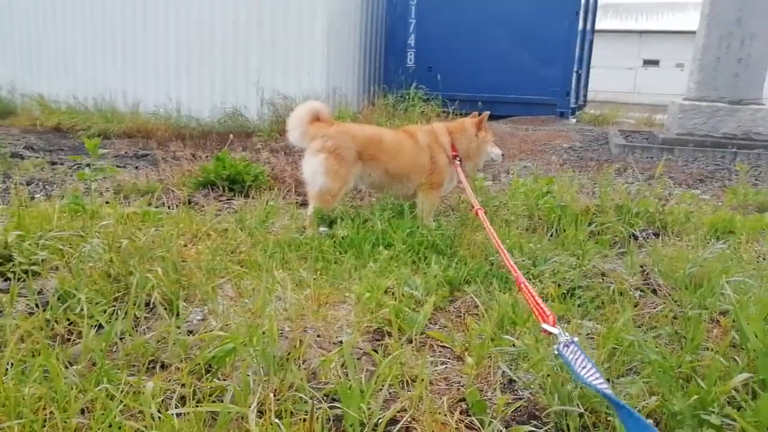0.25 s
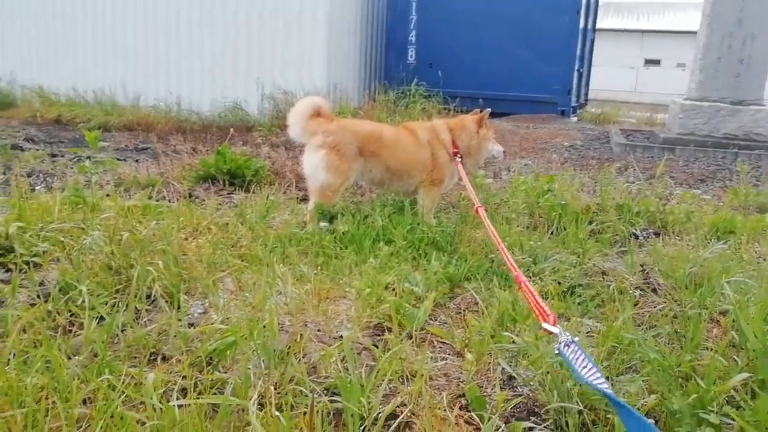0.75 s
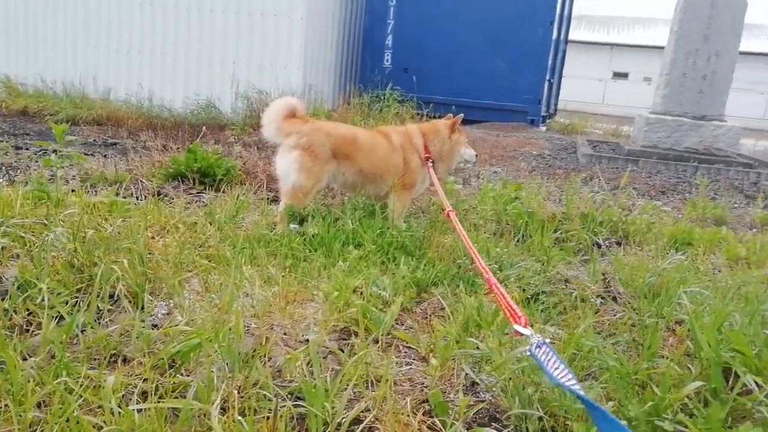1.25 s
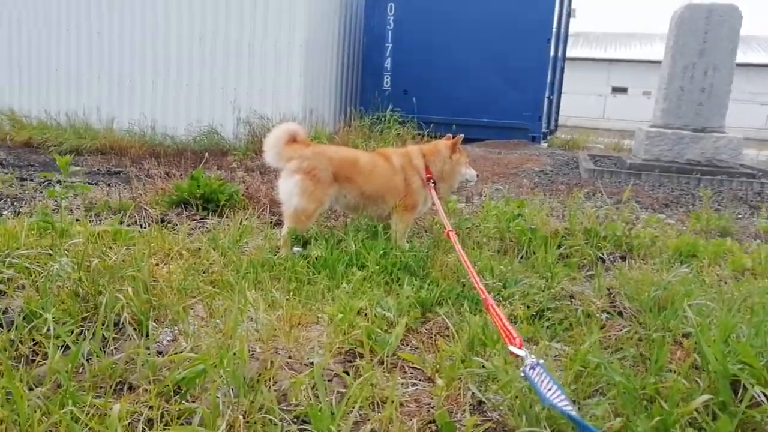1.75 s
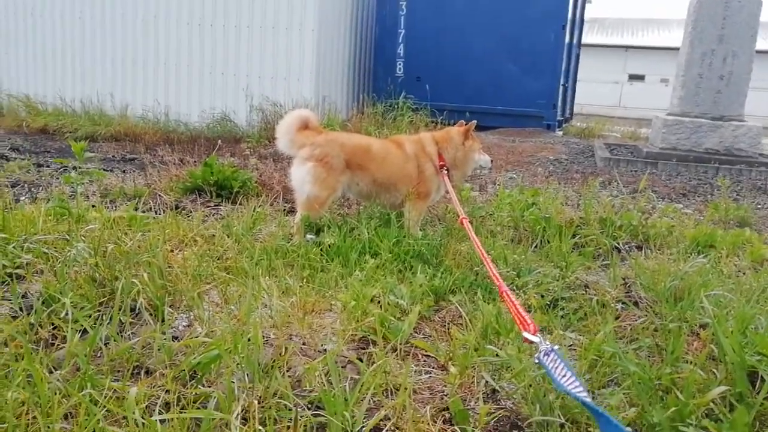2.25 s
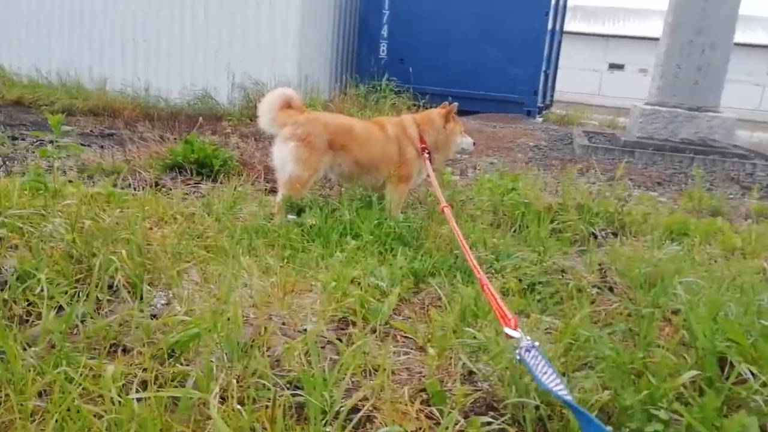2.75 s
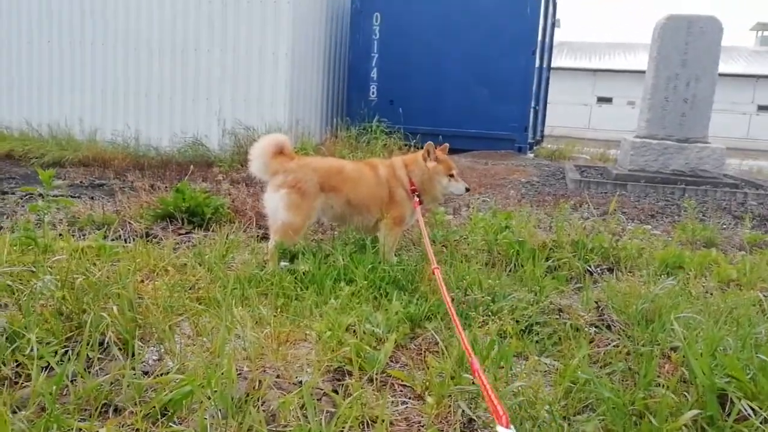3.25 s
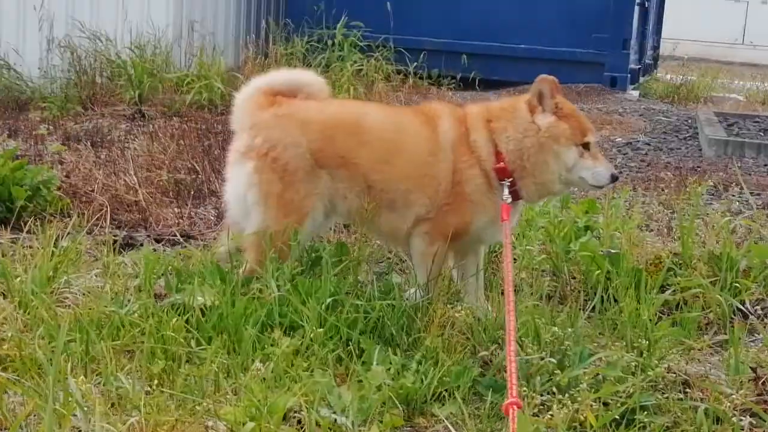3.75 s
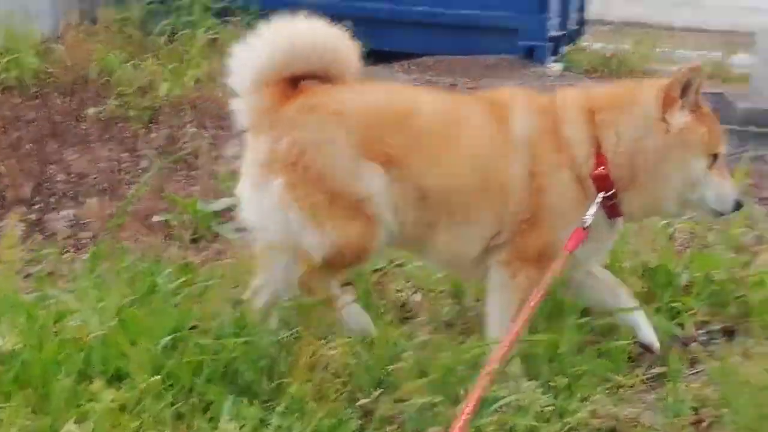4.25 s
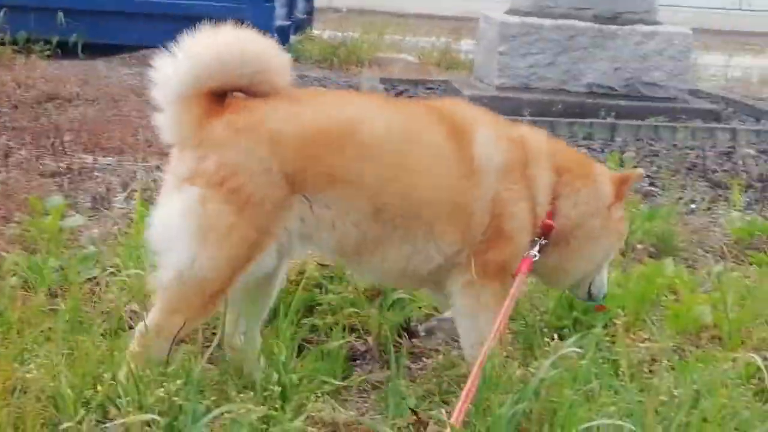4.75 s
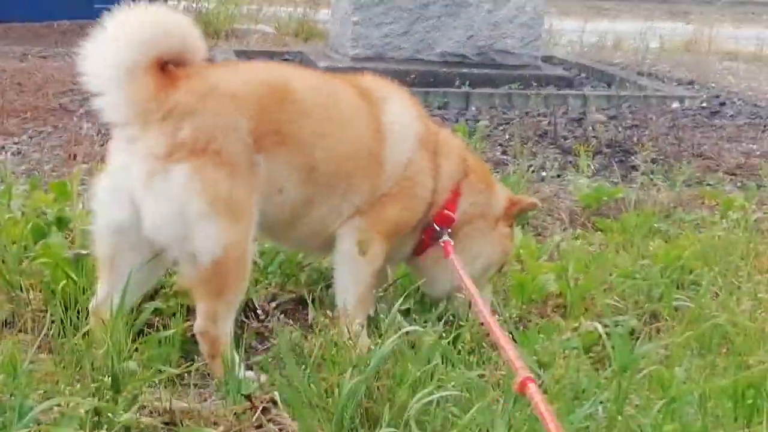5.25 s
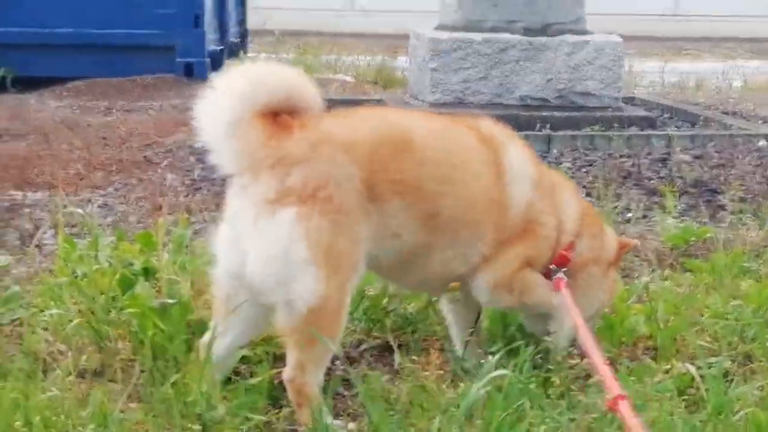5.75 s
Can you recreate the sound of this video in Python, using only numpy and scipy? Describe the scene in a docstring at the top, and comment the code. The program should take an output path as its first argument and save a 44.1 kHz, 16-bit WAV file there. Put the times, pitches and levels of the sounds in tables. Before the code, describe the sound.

A hand rubs, clicks and knocks on a camera outdoors, then a dog swishes through grass over a faint wavering engine hum.

```python
"""Outdoors in grass and weeds: a leashed dog steps and noses about, a few metres from a hand-held camera.
The dog's sweeps shape dense noisy grains of blade sound; paws set off bursts, and stems snap as damped pings.
Close to the right microphone port the hand rubs (noise and ringing bands), ticks (clicks) and knocks (case modes).
Far off an engine hums as wavering sines over rumble, in open-air noise; a thin insect-like buzz comes and goes."""
import sys
import numpy as np
from scipy import signal
from scipy.fft import rfft, irfft, next_fast_len
from scipy.io import wavfile
from scipy.ndimage import uniform_filter1d, map_coordinates

SR = 44100
rng = np.random.default_rng(int(sys.argv[2]) if len(sys.argv) > 2 else 0)


def put_to_file(sound):
    """Save the sound as 16-bit audio at rate SR, in the file named by the first command-line argument."""
    columns = np.atleast_2d(sound).T  # one column per channel
    safe = np.clip(columns, -1, 1)
    whole_steps = np.round(safe * 32767)
    wavfile.write(sys.argv[1], SR, whole_steps.astype(np.int16))


N = 264159
TIME = np.arange(N) / SR  # s


def amp(db):
    """Decibels to gain."""
    return 10 ** (np.asarray(db) / 20)


def unit(x):
    """Scale to rms 1."""
    return x / np.sqrt(np.mean(x ** 2) + 1e-20)


def along(points, hz):
    """Interpolate (frequency, value) points on a log frequency axis."""
    point_hz, value = np.transpose(points)
    return np.interp(np.log(hz + 1), np.log(point_hz + 1), value)


def curves(rows):
    """One value per sample for each column after the time."""
    start_s, *columns = np.transpose(rows)
    return [np.interp(TIME, start_s, column) for column in columns]


def wobble(rate):
    """A smooth random curve through rate normal draws a second."""
    knots = rng.standard_normal(int(N * rate / SR) + 4)
    return map_coordinates(knots, [TIME * rate])


def filtered(x, response):
    """Multiply the spectrum of x by a function of frequency."""
    size = next_fast_len(N + SR // 2)
    hz = np.fft.rfftfreq(size, 1 / SR)
    return irfft(rfft(x, size) * response(hz), size)[..., :N]


def coloured(x, spectrum):
    """x through a (Hz, dB) spectrum, at rms 1."""
    return unit(filtered(x, lambda hz: amp(along(spectrum, hz))))


def butter(x, kind, edge_hz, order):
    """A causal high- or low-pass."""
    sos = signal.butter(order, min(edge_hz, SR * .45), kind, fs=SR, output="sos")
    return signal.sosfilt(sos, x)


def grains(rate, spread_db, smooth):
    """Random impulses, rate a second and of unequal size, on a share of smooth noise; rms 1."""
    hit = rng.random(N) < rate / SR
    size_db = spread_db * np.minimum(rng.standard_normal(N), 2)
    size = amp(size_db) * rng.choice([-1, 1], N)
    return unit(unit(hit * size) + smooth * rng.standard_normal(N))


def patchy(x, depth_db):
    """Random patches of time and frequency rise and fall in level, so the colour shifts; rms 1."""
    frames = signal.stft(x, nperseg=256)[2]
    field = uniform_filter1d(rng.standard_normal(frames.shape), size=5, axis=0)  # frequency bins
    field = uniform_filter1d(field, size=14, axis=1)  # time frames
    return unit(signal.istft(frames * amp(depth_db * unit(field)), nperseg=256)[1][:N])


def narrow(x, pitch_hz, width_hz):
    """x as a resonant band that follows a pitch curve, at rms 1."""
    slow = filtered(x, lambda hz: 1 / (1 + 1j * hz / width_hz) ** 2)
    return unit(slow * np.sin(2 * np.pi * np.cumsum(pitch_hz) / SR))


def ping(hz, t60):
    """One damped mode, falling 60 dB in t60 seconds."""
    t = np.arange(SR // 20) / SR
    return amp(-60 * t / t60) * np.sin(2 * np.pi * hz * t)


def click(spectrum, tilt_db, size=1024):
    """A minimum-phase click of energy 1; positive tilt gathers it near 8 kHz, negative tilt dulls it."""
    hz = np.fft.rfftfreq(size, 1 / SR)
    octaves = np.log2(np.clip(hz, 600, 16000) / 8000)
    below_db = tilt_db * np.minimum(octaves, 0)
    above_db = -.8 * max(tilt_db, 0) * np.maximum(octaves, 0)
    cepstrum = irfft(np.log(amp(along(spectrum, hz) + below_db + above_db)))
    # keep only the causal half of the cepstrum
    cepstrum[0] = 0
    cepstrum[size // 2:] = 0
    wave = irfft(np.exp(rfft(2 * cepstrum)))
    return wave / np.linalg.norm(wave)


def add(track, start_s, sound):
    """Mix a sound into a track at a time."""
    part = track[..., max(round(start_s * SR), 0):][..., :sound.shape[-1]]
    part += sound[..., :part.shape[-1]]


def panned(x, pan_db):
    """Left and right with a level difference, left minus right."""
    return np.array([x * amp(pan_db / 2), x * amp(-pan_db / 2)])


TYPICAL_S = .06  # gesture length at which rise and fall times hold as given


def gesture(start_s, length_s, rise, fall):
    """Gain that swells before the start, holds for a length and dies away; longer gestures have softer edges."""
    edge = np.sqrt(max(length_s, .002) / TYPICAL_S)
    before = np.maximum(start_s - TIME, 0) / rise
    after = np.maximum(TIME - start_s - length_s, 0) / fall
    return amp(-20 * np.minimum((before + after) / edge, 10))


def blend(rows, rise, fall):
    """The power envelope of each (start, length, ..) row, and the remaining columns."""
    table = np.array(rows)
    shapes = [gesture(start_s, length_s, rise, fall) ** 2 for start_s, length_s in table[:, :2]]
    return np.array(shapes), table[:, 2:].T


# Open air around the microphone: pitch_hz, level_db (per Hz, relative)
OPEN_AIR = [(200, 4.5), (400, 7), (620, -5.5), (900, 1), (1400, 3.5), (2000, -2.5), (3700, -5), (4100, -1),
            (4500, -5.5), (6500, -5), (7600, -4), (8500, -1.5), (10300, -13), (15500, -14)]


def air():
    """A soft, slowly wavering outdoor wash of noise, independent at the two ports."""
    wash = coloured(rng.standard_normal((2, N)), OPEN_AIR)
    return amp(-67.0 + 0.72 * wobble(2.68)) * wash * amp([[-.4], [.4]])


ENGINE_HZ = 59.23  # first order
# Orders of the distant engine: order, level_db (orders 2 and 3: at the swell reference), waver_db
ENGINE_ORDERS = [(1, -68.5, 2.5), (2, -64, 2.5), (3, -61.5, 2), (4, -74, 4), (5, -74, 3.5)]
# Its two strongest orders swelling and fading: start_s, second_order_db, third_order_db
ENGINE_SWELL = [(0.0, -65, -54.5), (0.3, -57, -51.5), (0.36, -62, -60.5), (1.02, -60.0, -61.5),
                (1.44, -54, -54), (1.62, -62, -64.5), (2.1, -62.0, -55.5), (2.52, -57.5, -48.5),
                (2.7, -62.5, -78), (2.88, -58.5, -51.5), (3.48, -58.5, -68.5), (4.08, -71, -52.5),
                (4.56, -67, -61), (4.86, -61.5, -55), (5.04, -65, -58), (5.46, -54, -52),
                (5.64, -65.5, -65.5), (5.98, -59, -45.5)]
# Swell reference, where those orders have their listed level: second_order_db, third_order_db
SWELL_REFERENCE = (-61, -57.5)
# Distant rumble under the hum: pitch_hz, level_db (per Hz, relative)
DISTANT_RUMBLE = [(20, -8.5), (50, -8), (90, -4), (130, 0), (180, 4.5), (235, -1), (280, -9.5), (350, -18),
                  (500, -34), (900, -71)]


def engine():
    """Low orders of a distant engine waver on their way through the air, over a rumble."""
    turn = 2 * np.pi * ENGINE_HZ * TIME
    second_db, third_db = curves(ENGINE_SWELL)
    swell_db = {2: second_db - SWELL_REFERENCE[0], 3: third_db - SWELL_REFERENCE[1]}
    hum = np.zeros(N)
    for order, level_db, waver_db in ENGINE_ORDERS:
        waver = amp(waver_db * wobble(7))
        tone = np.sin(order * turn + 0.38 * wobble(5.2))
        hum += amp(level_db + swell_db.get(order, 0)) * unit(waver * tone)
    centre, side = coloured(rng.standard_normal((2, N)), DISTANT_RUMBLE)
    side = filtered(side, lambda hz: np.minimum(hz / 750, 1))  # shorter waves differ more between the ports
    return hum + amp(-61.0) * np.array([centre + side, centre - side])


# Calls of the insect-like buzz: start_s, length_s, level_db (before the overall gain), pitch_hz
BUZZ_CALLS = [(0, .32, -63.5, 5770), (.72, 0.45, -74, 5530), (1.92, 0.2, -69.5, 5730),
              (2.82, 0.43, -68, 5720), (4.48, .33, -60, 5590), (5.7, 0.37, -78, 5680)]
CALL_RISE, CALL_FALL = 0.12, .07  # s per 20 dB, for a call of typical length
INSECT_SAG_HZ, INSECT_REST_DB = 80, -81  # most a fading call sinks; buzz between calls, before overall gain


def insect():
    """A narrow, fuzzy band of stridulation, stronger at the right port, swells and fades with each call."""
    shapes, (level_db, call_hz) = blend(BUZZ_CALLS, CALL_RISE, CALL_FALL)
    effort = shapes.sum(axis=0)
    pitch_hz = call_hz @ shapes / effort - INSECT_SAG_HZ * (1 - np.sqrt(effort))
    gain = np.sqrt(amp(level_db) ** 2 @ shapes + amp(INSECT_REST_DB) ** 2)
    buzz = narrow(rng.standard_normal((2, N)), pitch_hz, width_hz=170)
    return buzz * panned(amp(-6.5) * gain, pan_db=-10)


# The hand pressing on the case: centre_s, level_db (at the peak), length_s (peak to 1/e)
CASE_PRESSES = [(2.45, -56, 0.063), (2.995, -57.5, 0.068), (5.506, -63, 0.046)]


def presses():
    """Pressure flexes the whole case: a soft low bump at both ports."""
    push = np.zeros(N)
    for centre_s, level_db, length_s in CASE_PRESSES:
        push += amp(level_db) * np.exp(-((TIME - centre_s) / length_s) ** 2)
    return push * coloured(rng.standard_normal(N), [(10, -26), (35, 2), (70, 6), (200, -32), (600, -80)])


# Hard plastic knocking on the case, at the right port:
# start_s, energy_db, brightness_db (per octave), port_ping_db (before brightness), bass_edge_hz
CASE_KNOCKS = [(0.3438, -7, 8, -18, 700), (0.347, 7, 1.5, 2, 600), (0.3541, -7, 0, 0, 507),
               (1.5853, 7, 1, 17.5, 857), (1.5885, -16, -5.5, 25, 830)]
# Modes of the case: pitch_hz, level_db (relative, before brightness), t60_s
CASE_MODES = [(920, -37, 0.00067), (1260, 3, 0.0058), (2080, -4, 0.0069), (2750, 8, 0.0034),
              (4236, 5, 0.0071), (6100, 4, 0.004), (7000, -10, 0.0067), (14800, -2, 0.0014)]
PORT_HZ = 8160  # resonance of the microphone port


def knocks():
    """Hard blows ring the case, which the hand damps within milliseconds; so small a body gives little bass."""
    out = np.zeros(N)
    for start_s, energy_db, tilt_db, ping_db, bass_hz in CASE_KNOCKS:
        ring = 0
        for hz, level_db, t60 in CASE_MODES + [(PORT_HZ, ping_db, .003)]:
            mode_db = level_db + tilt_db * np.log2(hz) + rng.normal(0, 1)
            ring = ring + amp(mode_db) * ping(hz, t60)
        contact = 1 - np.exp(-np.arange(len(ring)) / SR / .00006)  # soft onset, time constant in s
        ring = butter(ring * contact, "highpass", edge_hz=bass_hz, order=2)
        add(out, start_s, amp(energy_db) * ring / np.linalg.norm(ring))
    return out


# The grip catching and letting go, at the right port: start_s, energy_db, brightness_db (per octave)
GRIP_TICKS = [(0.0267, -23.5, -1.5), (.042, -26.5, 2), (.3054, -26.5, 0), (.4004, -27.5, -5.5),
              (.8513, -38, -10), (1.373, -34.5, -4), (1.6251, -16, 36), (2.2136, -6.5, 4),
              (2.2689, -19.5, 18), (2.4124, -17.5, -10), (2.4163, -25, -4.5), (2.4413, -23.5, 4),
              (2.4444, -28, -1), (2.4743, -26, -8.5), (2.535, -27.5, -3.5), (2.6144, -31, -1),
              (2.712, -30.5, -3.5), (2.9368, -20, 22), (2.9594, -8, -3.5), (2.9759, -5.5, 2),
              (3.0076, -10.5, -5), (3.0352, -19, -5), (3.073, -2, -8), (3.0776, -15.5, -9),
              (3.0804, -16, -7), (3.1023, -14.5, -7), (3.12, -17, -20), (3.1307, -10, 5.5),
              (3.134, -16, -14), (3.2007, -23, 15), (3.2566, -28.5, 3.5), (3.3035, -34, 13),
              (3.333, -31.5, -13), (3.5213, -28, -4.5), (5.7608, -33, -4)]
# Colour of one tick or slip before brightness: pitch_hz, level_db (per Hz, relative)
TICK_SPECTRUM = [(40, -27), (200, -10.5), (500, -10.5), (900, 4), (1400, 4.5), (2200, 5), (3500, 0.5),
                 (5500, 4), (8000, 10.5), (10000, -3.5), (15000, -11)]


def ticks():
    """Single slips of the grip: dull from a fingertip, bright from a nail."""
    out = np.zeros(N)
    for start_s, energy_db, tilt_db in GRIP_TICKS:
        add(out, start_s, -amp(energy_db) * click(TICK_SPECTRUM, tilt_db))
    return out


SLIPS_PER_S, FIRM_DB = 22, -62  # average rate under a firm grip; scrape level that counts as firm
SLIP_DB, SLIP_SPREAD_DB, SLIP_TILT_DB = -30, -1, 0.5  # energy, its random spread, spread of brightness


def slips(scrape_gain, count=400):
    """Faint ticks scattered through the strokes, more often under a firm grip."""
    out = np.zeros(N)
    firmness = np.minimum(scrape_gain / amp(FIRM_DB), 1)
    chance = SLIPS_PER_S * N / SR / count * firmness
    draws = zip(rng.random((count, 2)), rng.standard_normal((count, 2)))
    for (place, luck), (strength, colour) in draws:
        if luck < chance[int(place * N)]:
            slip = click(TICK_SPECTRUM, SLIP_TILT_DB * colour)
            add(out, place * N / SR, amp(SLIP_DB + SLIP_SPREAD_DB * strength) * slip)
    return out


# Skin sliding on the case: start_s, length_s, low_scrape_db, high_hiss_db (before mixing), finger_gap_hz
SKIN_STROKES = [(.025, .06, -61, -59, 7500), (.19, .065, -59.5, -57, 6500), (.32, .035, -55, -52, 6400),
                (.49, .12, -60.5, -68, 6700), (.643, 0.0062, -36, -33.5, 6870),
                (.666, 0.028, -47, -45.5, 7600), (1.14, .23, -82, -65, 8230),
                (1.618, .02, -55.5, -53, 8170), (1.935, .02, -90, -66, 8570),
                (2.068, .018, -86, -60.5, 7850), (2.174, .007, -67, -52, 8450),
                (2.215, 0.0092, -53, -46, 8000), (2.28, .11, -64.5, -66, 7500),
                (2.442, .02, -54, -54.5, 7300), (2.53, .1, -61.5, -64, 6750),
                (2.712, .033, -61.5, -67, 7030), (2.938, 0.017, -71, -43, 7600),
                (2.976, 0.011, -42, -36.5, 7000), (2.998, 0.014, -45.5, -39, 6800),
                (3.025, .035, -46.5, -45, 6580), (3.11, .025, -52, -54, 7600),
                (3.19, 0.11, -57.5, -58.5, 7990)]
# Colour of the low scrape: pitch_hz, level_db (per Hz, relative)
SCRAPE_SPECTRUM = [(60, 5), (200, -2), (500, -5), (900, 5), (1350, 1), (2000, -1.5), (2900, 3),
                   (3700, -3.5), (5000, -6.5), (9000, -36)]
# Colour of the high hiss: pitch_hz, level_db (per Hz, relative)
HISS_SPECTRUM = [(1500, -16), (2900, -11), (3700, -8.5), (5000, -10), (6500, -1.5), (8200, -1.5),
                 (9200, -5), (10500, -9.5), (14000, -15), (16000, -19)]
STROKE_RISE, STROKE_FALL = 0.049, 0.072  # s per 20 dB, for a stroke of typical length
LIGHT_TOUCH_HISS = 0.33  # share of broad hiss left when the finger barely touches and only the gap rings


def rubbing():
    """Skin sticks and slips on the case: a coarse scrape under a finer hiss, which rings in the finger gap."""
    shapes, (scrape_db, hiss_db, stroke_hz) = blend(SKIN_STROKES, STROKE_RISE, STROKE_FALL)
    scrape_gain, hiss_gain = np.sqrt(amp([scrape_db, hiss_db]) ** 2 @ shapes)
    gap_hz = stroke_hz @ shapes / shapes.sum(axis=0)
    grip = np.minimum(scrape_gain / hiss_gain, 1)
    breadth = LIGHT_TOUCH_HISS + (1 - LIGHT_TOUCH_HISS) * np.sqrt(grip)
    stutter = amp(2.3 * wobble(130))  # the slip comes in quick uneven surges
    scrape = coloured(grains(rate=700, spread_db=0, smooth=0.79), SCRAPE_SPECTRUM)
    scrape = patchy(scrape, depth_db=2.5)
    hiss = coloured(grains(rate=2000, spread_db=4, smooth=0.98), HISS_SPECTRUM)
    hiss = patchy(hiss, depth_db=5.0)
    ring = narrow(grains(rate=4300, spread_db=12.5, smooth=0.64), gap_hz, width_hz=840)
    treble = amp(-3.0) * breadth * hiss + amp(-3.5) * ring
    return stutter * (amp(-1.2) * scrape * scrape_gain + treble * hiss_gain) + slips(scrape_gain)


# Left microphone port against the right: pitch_hz, through_air_db, through_case_db
LEFT_PORT = [(100, -7.5, 11), (406, -0.5, 0), (795, -10, -22.5), (1960, -17, -12), (4300, -22, -11.5),
             (8000, -24, -12.5), (12700, -21, -22), (16000, -24, -3)]
PORT_LAG = 0.000579  # s


def at_left_port(x, loss):
    """Delay a right-port sound and change its level at each frequency."""
    return filtered(x, lambda hz: amp(along(loss, hz)) * np.exp(-2j * np.pi * hz * PORT_LAG))


def hand():
    """Handling is close to the right port and reaches the left later, recoloured; presses reach both at once."""
    points = np.array(LEFT_PORT)
    skin, blows = rubbing() + ticks(), knocks()
    left = at_left_port(skin, points[:, [0, 1]]) + at_left_port(blows, points[:, [0, 2]])
    return np.array([left, skin + blows]) + presses()


# Dry stems snapping under the paws: start_s, energy_db (before high-pass), left_minus_right_db, pitch_hz
DRY_STEMS = [(3.5752, -35, -4, 8700), (3.641, -40, 0, 7040), (3.781, -30, 3, 8900), (3.8078, -33, 3, 8600),
             (4.4415, -34, 0, 8500), (5.338, -41, -6, 7740), (5.673, -40, -18, 7200)]


def stems():
    """A stem breaks with a short high ping."""
    out = np.zeros((2, N))
    for start_s, energy_db, side_db, pitch_hz in DRY_STEMS:
        snap = ping(pitch_hz, t60=0.0083)
        snap = amp(energy_db) * snap / np.linalg.norm(snap)
        add(out, start_s, panned(snap, side_db))
    return butter(out, "highpass", edge_hz=4400, order=2)


# Colour of the swishing blades: pitch_hz, level_db (per Hz, relative)
BLADE_SPECTRUM = [(410, -38), (700, -22.5), (1400, -13.5), (1630, -17.5), (3300, -18), (4070, -10),
                  (5220, -9.5), (5790, -6), (7510, -3.5), (8230, 1), (9260, -4), (11600, -19),
                  (14800, -20.5), (15800, -22)]
# Balance of the blades between the ports: pitch_hz, left_minus_right_db
BLADE_BALANCE = [(3000, 1), (6200, -9), (7800, -4), (9000, 7), (11000, 1), (15000, -2)]
# Legs and muzzle sweeping through the grass, a few metres off:
# start_s, length_s, level_db (relative), left_minus_right_db, treble_over_middle_db
GRASS_SWEEPS = [(3.43, 0.034, -58, -.5, 0.5), (3.52, 0.073, -60.5, 2, 1), (3.71, 0.09, -63, 3, -.5),
                (4.07, 0.09, -63.5, 1, -1), (4.3, 0.17, -67.5, 2, -2), (4.485, 0.042, -50, 1, 3.5),
                (4.57, 0.16, -51.5, 1, 1), (4.84, 0.074, -59.5, 3.5, -10.5), (4.945, 0.017, -43, 1.5, 4.5),
                (5.025, 0.046, -45.5, 0.5, 6.5), (5.14, .055, -46, -3, 1), (5.23, 0.1, -57, -0.5, -1.5),
                (5.46, 0.056, -68, 3, -8), (5.83, .13, -72, 3, -9)]
SWISH_RISE, SWISH_FALL = 0.14, 0.15  # s per 20 dB, for a sweep of typical length
# Paws landing in the weeds: start_s, level_db (relative), left_minus_right_db, t60_s
PAW_LANDINGS = [(4.441, -50, 3, .1), (4.901, -45.5, 0, .12), (5.111, -46, -8, .1)]


def grass():
    """Countless blades flick past legs and muzzle, unrelated at the two ports; each paw sets off a burst."""
    shapes, (level_db, pan_db, treble_db) = blend(GRASS_SWEEPS, SWISH_RISE, SWISH_FALL)
    weight = amp(level_db) ** 2
    fine_db = (weight * treble_db) @ shapes / (weight @ shapes)  # fine tips sound bright, broad leaves dark
    ports = []
    for _ in range(2):
        flicks = coloured(grains(rate=3500, spread_db=5.5, smooth=0.76), BLADE_SPECTRUM)
        ports.append(patchy(flicks, depth_db=2.0))
    blades = filtered(np.array(ports), lambda hz: panned(0.91, along(BLADE_BALANCE, hz)))
    leaves = filtered(blades, lambda hz: 1 / (1 + (hz / 6500) ** 8))
    blades = blades + leaves * (amp(-fine_db) - 1)  # turn only the part below 6.5 kHz up or down
    flutter = amp(1.2 * wobble(70))
    power = panned(amp(level_db), pan_db) ** 2 @ shapes * flutter ** 2
    power = power + amp(-82.5) ** 2  # faint rustle throughout
    for start_s, paw_db, side_db, t60 in PAW_LANDINGS:
        decay = amp(paw_db - 60 * TIME[:SR // 2] / t60)
        add(power, start_s, panned(decay, side_db) ** 2)
    return blades * np.sqrt(power)


def scene():
    """Air, engine, insect, hand and dog together at the two ports."""
    return air() + engine() + insect() + hand() + stems() + grass()


TOP_HZ = 15900  # upper band limit


def record(dry):
    """The camera's band limit: a very steep low-pass."""
    return filtered(dry, lambda hz: 1 / (1 + (hz / TOP_HZ) ** 200))


dry = scene()
out = record(dry)
put_to_file(out)
```